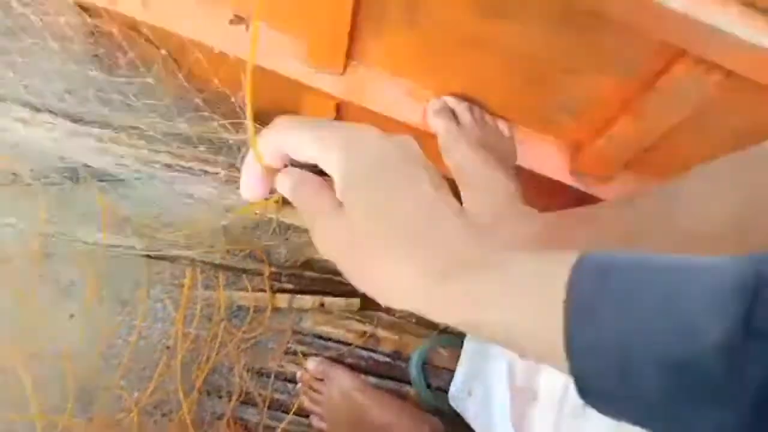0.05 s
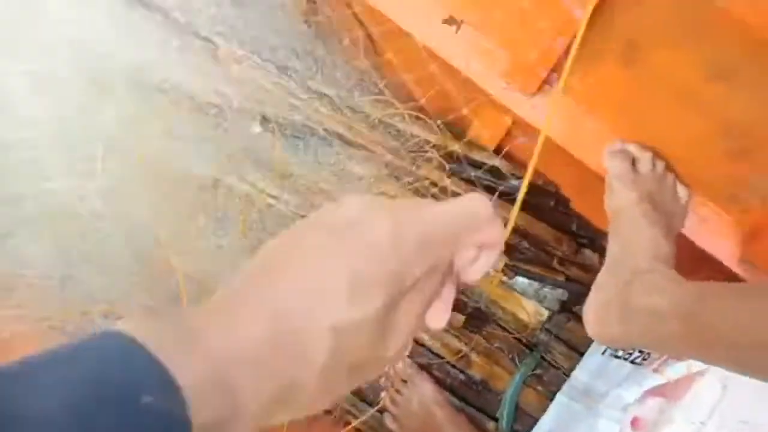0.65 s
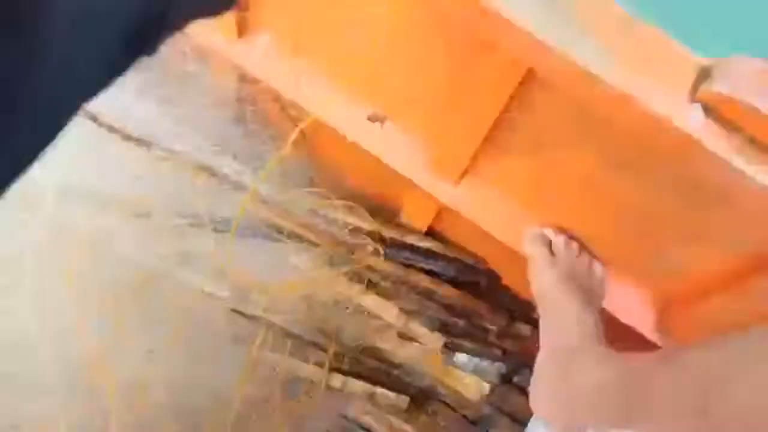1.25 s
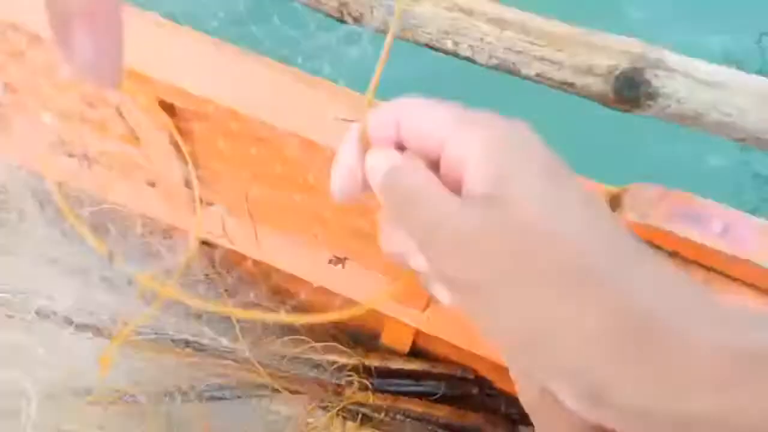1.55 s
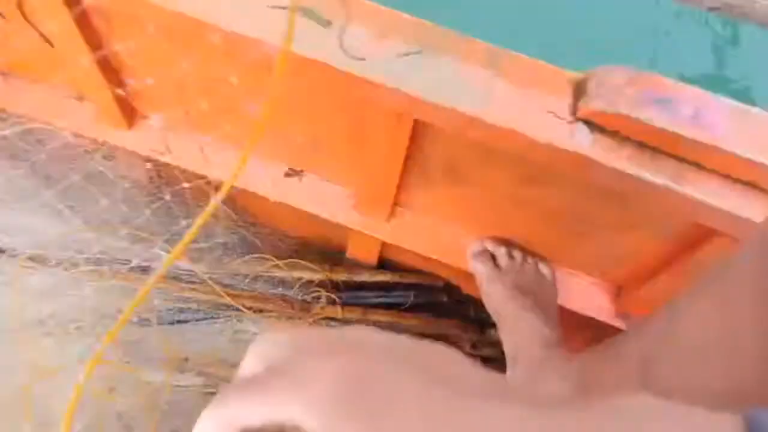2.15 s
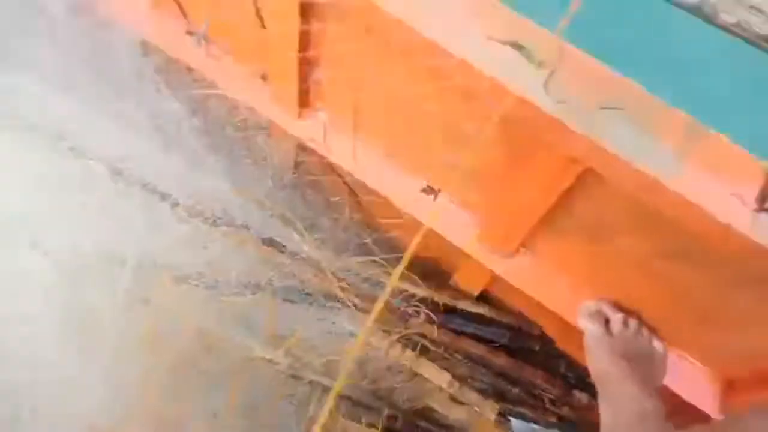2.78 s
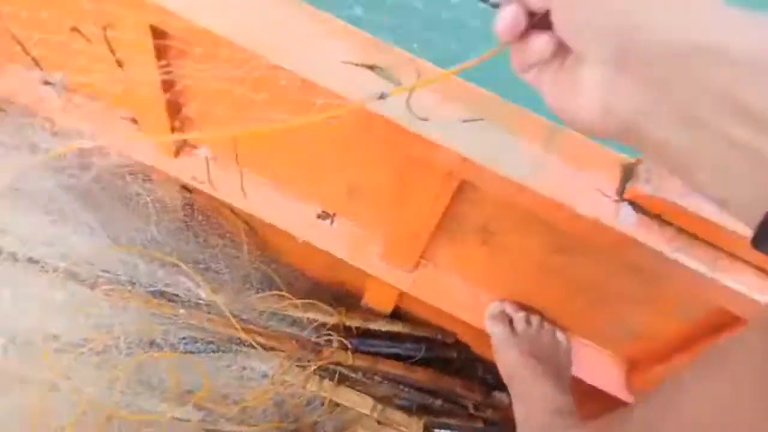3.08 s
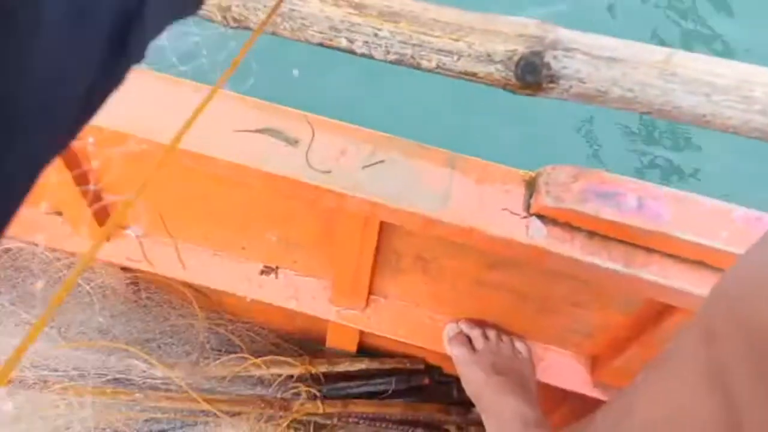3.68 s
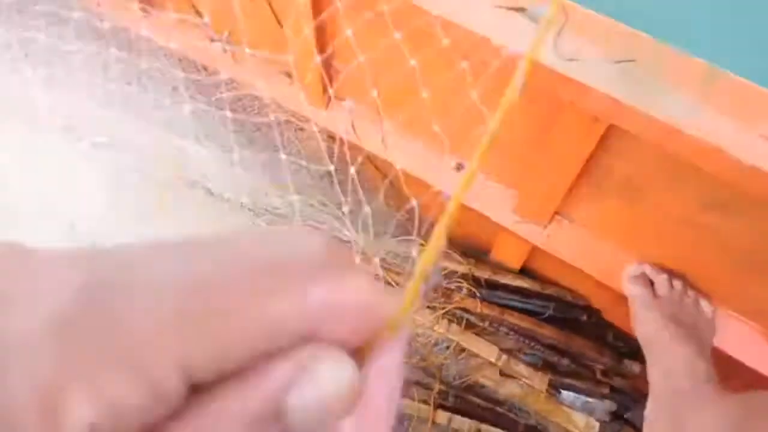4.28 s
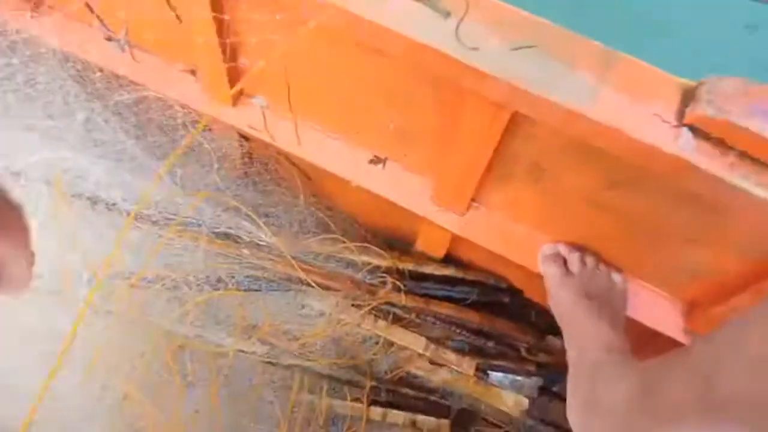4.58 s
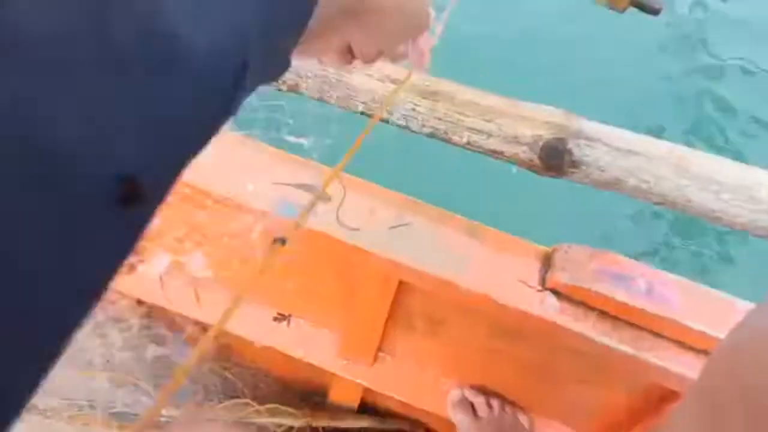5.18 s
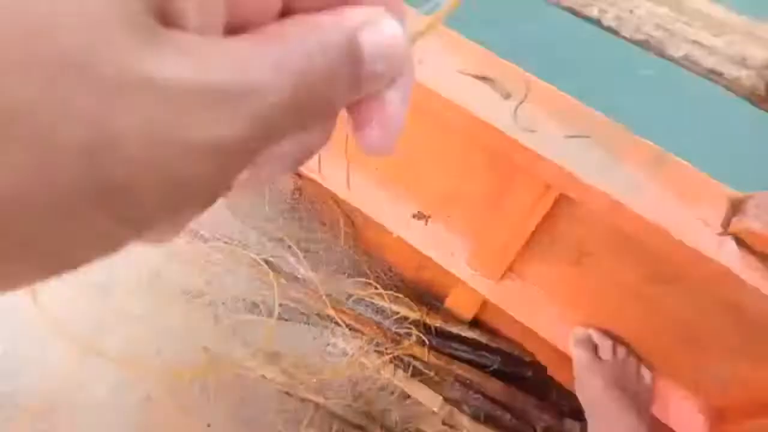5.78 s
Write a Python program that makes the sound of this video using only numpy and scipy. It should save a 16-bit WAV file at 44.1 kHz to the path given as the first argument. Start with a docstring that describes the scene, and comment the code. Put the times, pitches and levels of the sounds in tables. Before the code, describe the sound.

Close up on a small wooden boat in the open air, water laps quietly while wet mesh slides aboard with drips, twine ticks and soft thuds of feet. After about two seconds, sticks tied to the net start clattering and scraping over the rail, and a run of loud, hollow knocks makes the planks ring. The last second holds only small waves, drops and ticking twine.

```python
"""A fishing net is hauled into a small wooden boat, close by, over lapping water.
First wet mesh rasps over the rail, twine ticks, drops fall and feet bump the boards.
From 1.9 s the net's wooden sticks clack together and judder over the side;
from 2.3 to 5 s they knock on the hollow hull, whose planks ring.
Last come wavelets, drips and a few more ticks of twine."""
import sys
import numpy as np
from scipy import signal
from scipy.fft import rfft, irfft, next_fast_len
from scipy.io import wavfile
from scipy.ndimage import uniform_filter1d, minimum_filter1d, map_coordinates

SR = 44100
rng = np.random.default_rng(int(sys.argv[2]) if len(sys.argv) > 2 else 0)


def output_pcm(signal):
    """Save a mono or channel-first signal as 16-bit PCM at the path in sys.argv[1].

    Samples are clipped to [-1, 1] before scaling.
    """
    pcm = np.clip(np.atleast_2d(signal).T, -1, 1) * 32767
    wavfile.write(sys.argv[1], SR, np.round(pcm).astype(np.int16))


N = 266364
TIME = np.arange(N) / SR
AGE = np.arange(SR // 3) / SR  # seconds since a blow

# Briskness of the sliding mesh. Each row: time in seconds, level in dB.
SLIDING = [(0.0, -59.5), (0.64, -63.5), (0.79, -67.5), (1.72, -64.5), (1.83, -60), (1.98, -62.5),
           (2.39, -66), (3.77, -65), (3.95, -70.5), (4.46, -77.5), (4.69, -73.5), (5.35, -72.5),
           (5.62, -62.5), (6.04, -69)]
# Spectrum of splashes and scuffs. Each row: frequency in Hz, gain in dB.
SPLASH_EQ = [(40, -51.5), (150, -15.5), (450, 5.5), (900, -0.5), (1500, -6), (2600, -8.5), (4000, -27.5),
             (6000, -31), (16000, -56)]
# Spectrum of a stick's crack or scrape. Each row: frequency in Hz, gain in dB.
CRACK_EQ = [(60, -68.5), (150, -13.5), (700, 2), (1300, 1), (2000, -1), (3400, -17.5), (4500, -33.5),
            (6000, -38.5), (8300, -40), (16000, -58.5)]
# Resonances of the stick bundle. Each row: centre in Hz, width in Hz, gain in dB.
STICK_MODES = [(854, 130, 1), (1054, 18, 1), (1404, 16, 9.5), (1680, 23, -8.5), (1654, 41, 1.5),
               (1840, 390, -8.5), (2440, 210, -16), (2820, 640, -9), (3170, 120, -11.5)]


def amp(db):
    """Decibels to gain."""
    return 10 ** (np.asarray(db) / 20)


def unit(x):
    """x at rms 1."""
    return x / np.sqrt(np.mean(x ** 2) + 1e-20)


def crest(x, size=220):
    """x with its loudest window of size samples at rms 1."""
    return x / np.sqrt(uniform_filter1d(x ** 2, size).max() + 1e-20)


def curve(rows):
    """(seconds, value) rows interpolated to every sample."""
    return np.interp(TIME, *np.transpose(rows))


def wobble(rate_hz):
    """Smooth random curve, rate_hz points a second."""
    return map_coordinates(rng.standard_normal(int(N * rate_hz / SR) + 4), [TIME * rate_hz])


def add(track, start_s, x):
    """Mix x into the track."""
    start = max(round(start_s * SR), 0)
    track[start:start + len(x)] += x[:max(N - start, 0)]


def colour(x, points):
    """Minimum-phase filter through (Hz, dB) points."""
    size = 2 * next_fast_len(len(x) // 2 + 4096)
    hz, db = np.transpose(points)
    bin_db = np.interp(np.log(np.fft.rfftfreq(size, 1 / SR) + 1), np.log(hz), db)
    cepstrum = irfft(np.log(amp(bin_db)))
    cepstrum[1:size // 2] *= 2
    cepstrum[size // 2 + 1:] = 0
    return irfft(rfft(x, size) * np.exp(rfft(cepstrum)))[:len(x)]


def resonate(x, modes):
    """x through parallel (Hz, width in Hz, dB) resonances of alternating sign."""
    size = 2 * next_fast_len(len(x) // 2 + 4096)
    f = np.fft.rfftfreq(size, 1 / SR)
    response = sum((-1) ** k * amp(db) * 1j * f * width / (hz * hz - f * f + 1j * f * width)
                   for k, (hz, width, db) in enumerate(modes))
    return irfft(rfft(x, size) * response)[:len(x)]


def fade(t60_s, hold_s=0, rise_s=0.0004):
    """Envelope of a blow: rises, holds while the contact chatters, dies."""
    return (1 - np.exp(-AGE / rise_s)) * amp(-60 * np.maximum(AGE - hold_s, 0) / t60_s)


def burst(t60_s, hold_s=0, rise_s=0.00096):
    """Noise under the envelope of a blow."""
    return rng.standard_normal(len(AGE)) * fade(t60_s, hold_s, rise_s)


def grains(per_s, spread_db):
    """Random tiny impacts of uneven size, rms 1."""
    sizes = amp(spread_db * np.clip(rng.standard_normal(N), -2, 2)) * rng.choice([-1, 1], N)
    return unit(sizes * (rng.random(N) < per_s / SR))


def lapping_and_boom(rise_s=0.012, fall_s=0.046):
    """The sea laps softly at the hull, with brief low swells from bumps and wavelets."""
    # Steady lapping. Each row: time in seconds, level in dB.
    sea = [(0, -54.5), (1.3, -52.5), (4.2, -47.5), (5.1, -53), (6.04, -48.5)]
    # Low hull boom after the bumps at 0.73 and 1.02 s; the other rows are wavelets slapping the hull.
    # Each row: time of peak in seconds, level in dB.
    low_swells = [(0.17, -54), (0.73, -45), (1.02, -37.5), (5.04, -39), (5.16, -51), (5.64, -39.5),
                  (6.02, -45.5)]
    # Spectrum of both. Each row: frequency in Hz, gain in dB.
    low_eq = [(20, -50), (40, -21.5), (80, -1), (140, 7.5), (220, -1), (350, -0.5), (600, -6.5),
              (1500, -45.5), (16000, -100)]
    swells = sum(amp(db) * np.exp(-np.maximum((s - TIME) / rise_s, (TIME - s) / fall_s))
                 for s, db in low_swells)
    envelope = (amp(curve(sea)) + swells) * amp(3.1 * wobble(20))
    return envelope * unit(colour(rng.standard_normal(N), low_eq))


def bubble(hz, t60_s):
    """A trapped bubble rings, its pitch climbing as it nears the surface."""
    return crest(np.sin(2 * np.pi * hz * (AGE + 1.9 * AGE ** 2)) * fade(t60_s, rise_s=0.0013))


def runoff(bubble_count=180, db_per_sliding_db=0.66):
    """Water runs off the net, more as it slides faster, leaving drops and small bubbles."""
    # Drops falling in the sea. Each row: start in seconds, level in dB, pitch in Hz.
    drips = [(0.4955, -34.5, 1340), (1.129, -41, 1650), (1.2886, -35.5, 1970), (1.34, -37, 1550),
             (1.5643, -39.5, 1514), (5.5297, -40.5, 2050), (5.6067, -40, 1760)]
    sliding_db = curve(SLIDING)
    flow_db = 14 + sliding_db.mean() + db_per_sliding_db * (sliding_db - sliding_db.mean())
    droplets = grains(per_s=840, spread_db=-3) + 0.5 * rng.standard_normal(N)
    patter = unit(colour(droplets, SPLASH_EQ))
    fizz = np.zeros(N)
    for when, pitch, size in rng.random((bubble_count, 3)):
        hz = 900 * 3.3 ** pitch
        add(fizz, when * N / SR, amp(10 * size) * bubble(hz, 25 / hz))
    out = amp(flow_db + 1.7 * wobble(17)) * (patter + amp(-13) * unit(fizz))
    for s, db, hz in drips:
        spatter = crest(resonate(burst(0.14), [(hz, 700, 0)]))
        add(out, s, amp(db) * (amp(-4.5) * bubble(hz, 0.043) + amp(-14) * spatter))
    return out


def mesh():
    """Wet mesh crackles finely as it slides, and now and then snaps free."""
    # Crackle spectrum. Each row: frequency in Hz, gain in dB.
    mesh_eq = [(300, -28.5), (1000, -27.5), (3000, 3), (5200, -10.5), (7100, -2), (9000, -0.5),
               (16000, -7.5)]
    # Mesh snapping free. Each row: start in seconds, level in dB.
    snaps = [(0.616, -36.5), (0.7024, -45.5), (0.7218, -30), (0.9724, -31), (1.249, -49.5), (1.366, -41.5),
             (1.6477, -40.5), (1.7428, -36), (2.1154, -27), (2.531, -41), (2.696, -44.5), (3.112, -43),
             (3.1597, -39), (3.818, -40.5), (3.9974, -44.5), (4.28, -53), (4.507, -40), (4.9897, -47)]
    snap_eq = [(100, -44), (800, -14.5), (3000, 4.5), (6000, -10), (9000, 1), (16000, -19.5)]
    crackle = grains(per_s=450, spread_db=7) + 0.6 * rng.standard_normal(N)
    jerk_db = 2 * wobble(30)
    out = amp(curve(SLIDING) + jerk_db + 2) * unit(colour(crackle, mesh_eq))
    for s, db in snaps:
        snap = colour(burst(0.036, hold_s=0.003), snap_eq)
        add(out, s, amp(db - 9) * crest(snap))
    return out


def swishes(lead_s=0.092):
    """Each pull rasps the net's knots over the rail."""
    # Each row: centre in seconds, level in dB, Gaussian half width in seconds, pitch in Hz.
    pulls = [(0.166, -32, 0.026, 820), (0.265, -35.5, 0.01, 970), (0.412, -37.5, 0.0095, 1200),
             (0.499, -39, 0.077, 686), (0.625, -34, 0.0072, 420), (0.72, -25, 0.012, 900),
             (0.99, -26.5, 0.01, 566), (1.346, -49, 0.02, 2020)]
    rasp_eq = [(100, -1), (300, 8.5), (1300, -1.5), (2800, -4.5), (5000, -17.5), (8000, -6),
               (16000, -17)]
    out = np.zeros(N)
    for s, db, half_s, hz in pulls:
        knots = rng.standard_normal(len(AGE)) * amp(6.8 * rng.standard_normal(len(AGE)))
        rasp = colour(resonate(knots, [(hz, hz * 0.62, 0)]), rasp_eq)
        stroke = np.exp(-((AGE - lead_s) / half_s) ** 2 / 2)
        add(out, s - lead_s, amp(db) * stroke * unit(rasp))
    return out


def ticks():
    """Taut twine slips over the rail: a tiny ping and a faint answer from the boat."""
    # Each row: start in seconds, level in dB, pitch in Hz, t60 in seconds.
    slips = [(0.3946, -26, 1770, 0.0025), (0.615, -11, 1030, 0.0097), (0.702, -18.5, 1330, 0.00077),
             (1.3656, -27.5, 2600, 0.007), (1.6483, -28, 2130, 0.011), (2.1174, -19.5, 1990, 0.0049),
             (2.6968, -13, 1440, 0.00078), (3.0192, -27, 2360, 0.015), (4.2365, -30.5, 1800, 0.0056),
             (4.588, -27.5, 1964, 0.0042), (5.593, -31, 1795, 0.0048), (5.7004, -34.5, 2000, 0.0096),
             (5.7869, -28.5, 1880, 0.0051), (5.8832, -29.5, 1890, 0.0043), (5.9375, -23, 1900, 0.0044),
             (6.02, -31, 1880, 0.0049)]
    out = np.zeros(N)
    for s, db, hz, t60_s in slips:
        ping = np.sin(2 * np.pi * hz * AGE) * fade(t60_s, rise_s=0.00019)
        answer = resonate(burst(0.034), [(hz, 900, 0)])
        add(out, s, amp(db) * (amp(-1) * crest(ping) + amp(-13) * crest(answer)))
    return colour(out, [(150, -34.5), (800, -5), (3000, -7), (6000, -31.5), (12000, -22)])


def bumps():
    """Soft, heavy feet push the boards for a few cycles, with a scuff on top."""
    # Each row: start in seconds, level in dB, relative scuff level in dB, pitch in Hz.
    footfalls = [(0.726, -15.5, -4, 337), (0.862, -30.5, -7.5, 273), (0.976, -15.5, -5.5, 288),
                 (1.055, -25.5, -6, 284), (1.418, -18, -18, 156), (1.645, -25.5, -5, 150),
                 (1.739, -24, 0, 235), (1.927, -13, -34, 158), (1.961, -6, -42, 171),
                 (2.191, -6.5, -21, 419), (4.125, -18.5, -37, 161), (5.625, -26, -11, 376)]
    out = np.zeros(N)
    for s, db, scuff_db, hz in footfalls:
        push = crest(np.sin(2 * np.pi * hz * AGE) * fade(0.061, hold_s=0.011, rise_s=0.0079))
        thud_eq = [(hz / 4, -35), (hz * 0.58, 0), (hz * 2, -3), (hz * 8, -38), (hz * 30, -70)]
        thud = crest(colour(burst(0.11, hold_s=0.0013, rise_s=0.0012), thud_eq))
        scuff = crest(colour(burst(0.052, rise_s=0.0003), SPLASH_EQ))
        add(out, s, amp(db) * (amp(-9) * push + amp(-9.5) * thud + amp(scuff_db - 10) * scuff))
    return out


def boards(x):
    """Blows reach the hull through the floor boards, which ring mostly low."""
    # Each row: centre in Hz, width in Hz, gain in dB.
    board_modes = [(174.2, 73, -4), (244.7, 34, -2), (289.6, 28.5, -0.5), (402.3, 39, -1), (469, 42.6, 2.5),
                   (612, 63, 0), (747, 79, -6), (916, 300, -14.5)]
    board_eq = [(40, -11), (100, -1.5), (900, -5.5), (1800, -6), (4000, -28), (16000, -71.5)]
    return colour(resonate(x, board_modes), board_eq)


def judder(rise_s=0.023, fall_db_per_s=137.5):
    """Each dragged stick stutters over the rail and keeps boards and bundle ringing."""
    # Each row: start in seconds, level in dB, time on the rail in seconds.
    drags = [(1.888, -9.5, 0.081), (2.18, -17.5, .11), (2.40, -13.5, 0.12), (2.63, -16, 0.13),
             (2.84, -16.5, .15), (3.06, -21.5, 0.17), (3.302, -20, 0.064), (3.52, -15, .1),
             (3.70, -15, 0.096)]
    bundle_eq = [(100, 5), (700, -9), (2900, -24.5), (5000, -14.5), (16000, -47)]
    envelope = np.zeros(N)
    for s, db, hold_s in drags:
        age = np.maximum(TIME - s, 0)
        envelope += amp(db - fall_db_per_s * np.maximum(age - hold_s, 0)) * (1 - np.exp(-age / rise_s))
    slips = grains(per_s=1200, spread_db=2) * amp(wobble(25.42))
    bundle = unit(colour(resonate(slips, STICK_MODES), bundle_eq))
    scrape = unit(colour(slips, CRACK_EQ))
    return envelope * (amp(-4.5) * unit(boards(slips)) + amp(-30) * bundle + amp(-24.5) * scrape)


def clacks(t60_s=0.12):
    """Stick grazes, then hits stick: a bright crack and ring, and the boat booms below."""
    # Each row: start in seconds, level in dB, relative boom level in dB, stick's note in Hz.
    hits = [(1.861, -14, 1, 1566), (1.902, -4.5, -3.5, 1415), (1.934, -13, 0, 917), (2.170, -6, -1, 1111),
            (2.252, -27, 5.5, 1180), (2.296, -21.5, 2, 1160), (2.392, -7.5, 2.5, 1535),
            (2.531, -24, 10, 1385), (2.616, -10.5, 4.5, 977), (2.72, -19.5, 5.5, 934), (2.831, -13, 4, 905),
            (2.921, -27.5, 2.5, 1156), (3.051, -8, -0.5, 937), (3.271, -9, 3, 893),
            (3.366, -20.5, 5.5, 915), (3.497, -17.5, 4, 944), (3.673, -14, -1, 1495), (3.818, -23, 5, 1247),
            (3.907, -30.5, 7, 997)]
    wood_eq = [(200, -9.5), (600, 3), (3100, -6.5), (5000, -29.5), (16000, -43)]
    out = np.zeros(N)
    for s, db, boom_db, note_hz in hits:
        contact = burst(t60_s, rise_s=0.00036) + 1.47 * burst(0.048, hold_s=0.00058)
        crack = crest(colour(contact, CRACK_EQ))
        ring = crest(resonate(burst(t60_s * 1.2, hold_s=0.0026), STICK_MODES))
        note = np.sin(2 * np.pi * note_hz * AGE) * fade(t60_s, hold_s=0.0048, rise_s=0.0036)
        wood = colour(amp(-13) * ring + amp(-6) * note, wood_eq)
        boom = crest(boards(burst(0.19, hold_s=0.022, rise_s=0.00049)))
        add(out, s, amp(db) * (amp(-5.5) * crack + wood + amp(boom_db - 4) * boom))
        graze = crest(colour(burst(0.04, hold_s=0.0046, rise_s=0.0032), CRACK_EQ))
        add(out, s - 0.007, amp(db - 23.5) * graze)
    return out


def knocks(max_t60_s=0.24):
    """A stick brushes the hull, lands and chatters; the planks ring, damped by the water outside."""
    # Each row: start in seconds, level in dB, relative edge level in dB, tilt in dB per octave.
    blows = [(2.294, -3.5, -8.5, -5.5), (2.419, -17.5, -25, 5), (2.851, -4, -8, 1.5),
             (3.073, -1.5, -32, 3.5), (3.157, 4, -10, 2), (3.344, -6, -12.5, 1.5), (3.455, 1.5, -19.5, 2),
             (3.7, 0, -24.5, 3.5), (3.984, 4.5, -15.5, -1), (4.258, 4, -22, 0.5), (4.505, 6, -20.5, -3.5),
             (4.721, 3.5, -15.5, -6), (4.933, 3.5, -13.5, 2)]
    # Each row: frequency in Hz, level in dB, t60 in seconds before the cap.
    hull_modes = [(131.5, -14.5, 0.65), (209.8, -7, 0.27), (251, -10.5, 0.15), (323, 1, 0.14),
                  (367.4, 4, 0.068), (427.8, 2, 0.11), (494.3, 1, 0.099), (540.4, 8.5, 0.034),
                  (678, 4.5, 0.07), (748, -9.5, 0.13), (957, -17, 0.055), (1102, -23, 0.11),
                  (1201, -18, 0.085), (1580, -31.5, 0.1)]
    # Spectra of the planks and the blow's hard edge. Each row: frequency in Hz, gain in dB.
    plank_eq = [(30, -65.5), (70, -9.5), (120, -2.5), (200, 1.5), (370, 7), (550, 1), (800, -7.5),
                (1500, -31.5), (2600, -46), (4500, -54), (16000, -85)]
    edge_eq = [(100, -42), (700, -10.5), (1250, 7.5), (1650, -1.5), (2300, -5), (3200, -22), (4500, -35),
               (8300, -39), (16000, -67.5)]
    out = np.zeros(N)
    hz, mode_db, t60_s = np.transpose(hull_modes)[:, :, None]
    # Modes build up over a few cycles.
    envelopes = fade(np.minimum(t60_s, max_t60_s), hold_s=0.0062, rise_s=4.2 / hz)
    for s, db, edge_db, tilt_db in blows:
        # The place of the blow favours low or high modes.
        strength = amp(mode_db + tilt_db * np.log2(hz / 450) + rng.standard_normal(hz.shape))
        swing = np.sin(2 * np.pi * (hz * AGE + rng.random(hz.shape)))
        ring = crest(np.sum(strength * swing * envelopes, axis=0), size=700)
        planks = crest(colour(burst(0.19, hold_s=0.019, rise_s=0.0018), plank_eq))
        contact = burst(0.1, rise_s=0.001) + 2 * burst(0.014)
        edge = crest(colour(contact, edge_eq))
        add(out, s, amp(db) * (amp(-9.5) * ring + amp(-17) * planks + amp(edge_db - 10.5) * edge))
        brush = crest(colour(burst(0.02, hold_s=0.0091, rise_s=0.003), plank_eq))
        add(out, s - 0.005, amp(db - 33.5) * brush)
    return out


def scene():
    """Mono mix, all within arm's reach in open air."""
    sticks = knocks() + clacks() + judder()
    return (sticks + bumps() + ticks() + swishes() + mesh() + runoff() + lapping_and_boom())[None]


def record(dry):
    """Microphone treble colour, low cut, peak limiter, band limit."""
    # Treble resonance of the microphone's port. Each row: frequency in Hz, gain in dB.
    port_eq = [(7600, -0.5), (8250, 8), (9100, -1.5), (10200, -6.5), (11400, -3), (12500, -6.5),
               (16000, -1.5)]
    low_cut_hz, top_hz, ceiling = 30, 16280, 0.89
    highpass = signal.butter(2, low_cut_hz, "highpass", fs=SR, output="sos")
    filtered = signal.sosfilt(highpass, colour(dry[0], port_eq))
    needed_gain = ceiling / np.maximum(np.abs(filtered), ceiling)
    held_gain = minimum_filter1d(needed_gain, size=180)
    gain = uniform_filter1d(uniform_filter1d(held_gain, size=90), size=90)
    size = next_fast_len(N + 4096)
    passband = np.fft.rfftfreq(size, 1 / SR) < top_hz
    return irfft(rfft(filtered * gain, size) * passband, size)[None, :N]


dry = scene()
out = record(dry)
output_pcm(out)
```